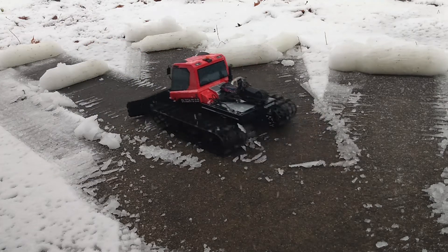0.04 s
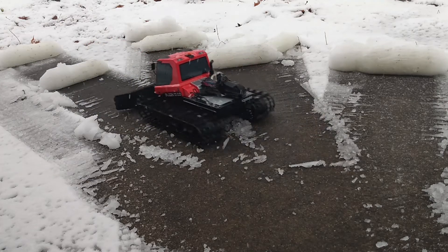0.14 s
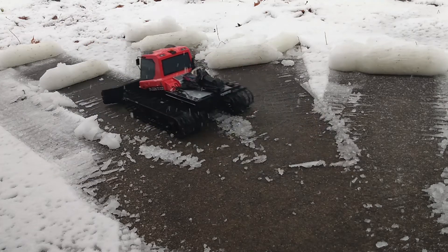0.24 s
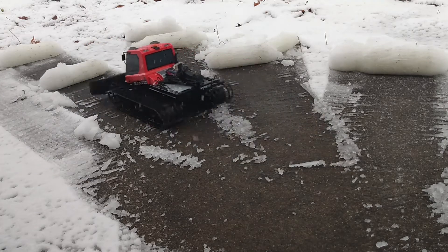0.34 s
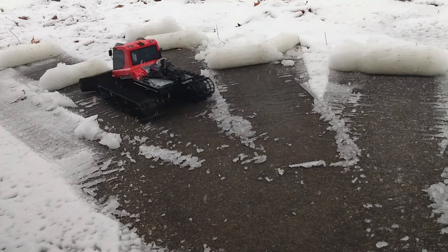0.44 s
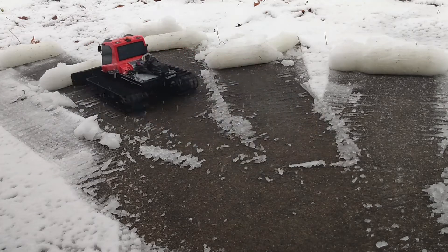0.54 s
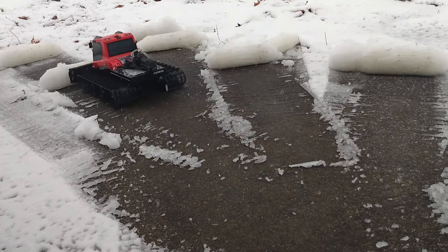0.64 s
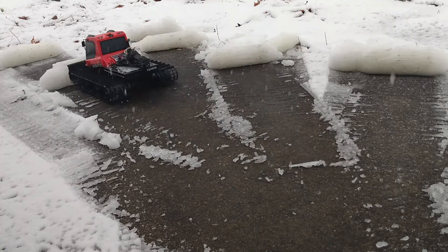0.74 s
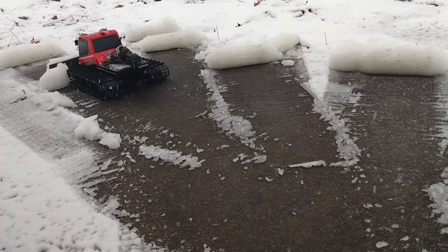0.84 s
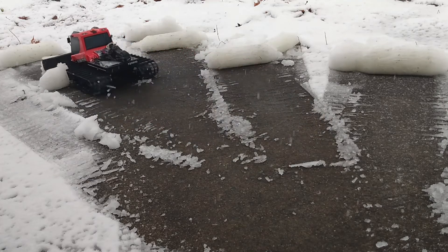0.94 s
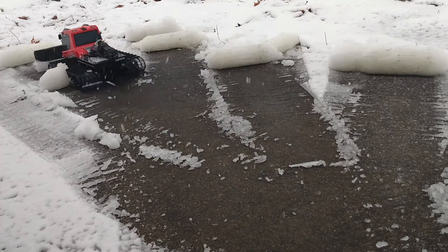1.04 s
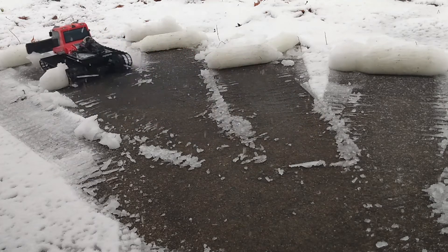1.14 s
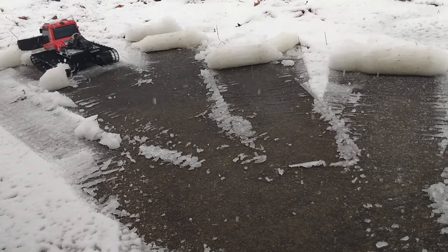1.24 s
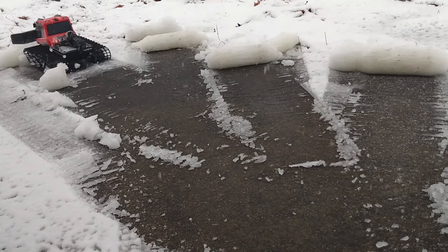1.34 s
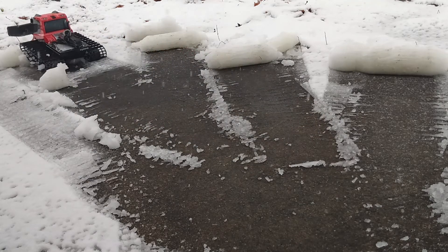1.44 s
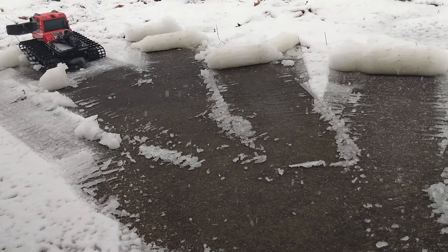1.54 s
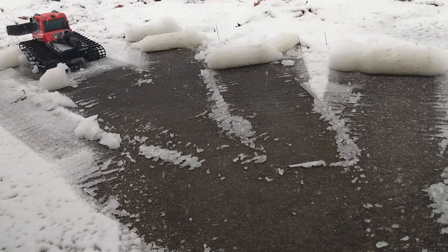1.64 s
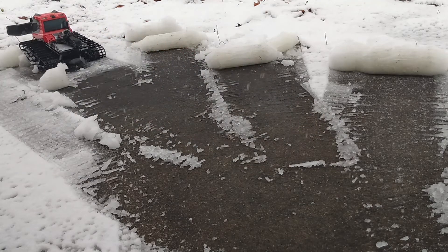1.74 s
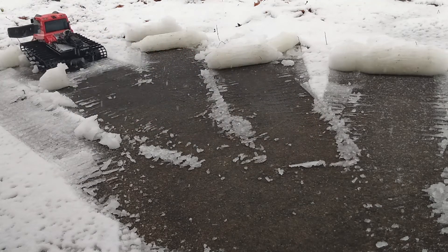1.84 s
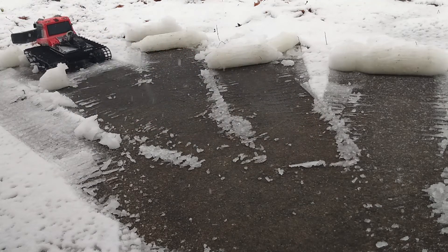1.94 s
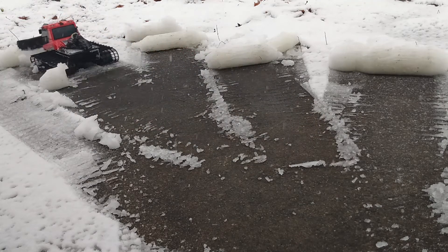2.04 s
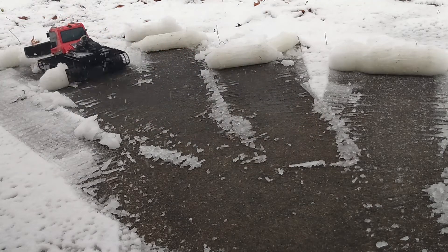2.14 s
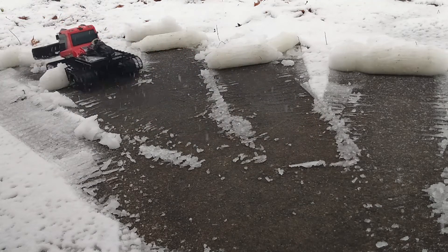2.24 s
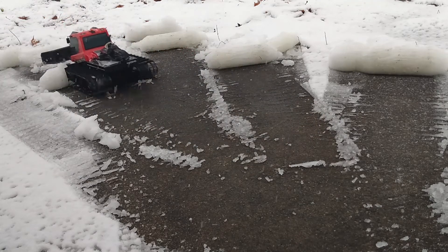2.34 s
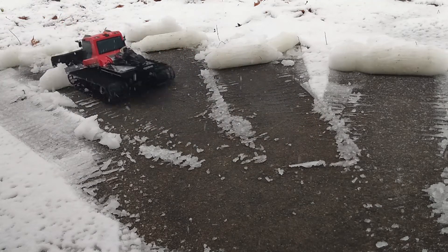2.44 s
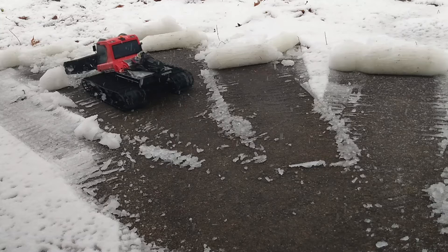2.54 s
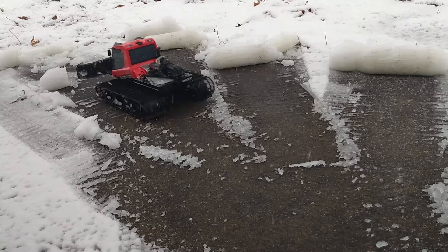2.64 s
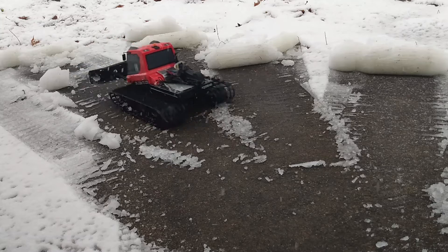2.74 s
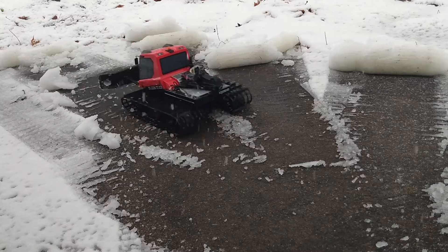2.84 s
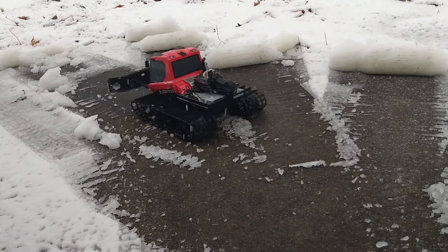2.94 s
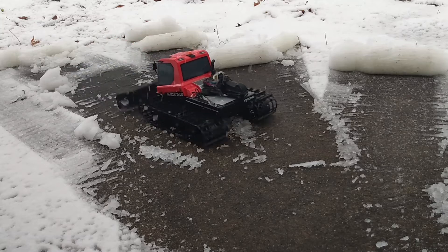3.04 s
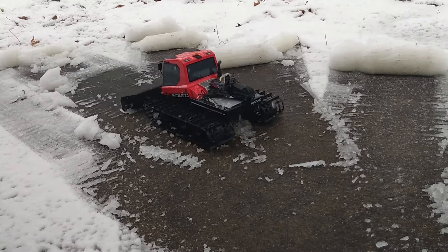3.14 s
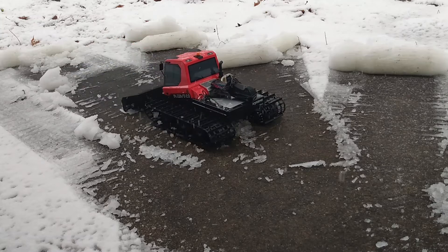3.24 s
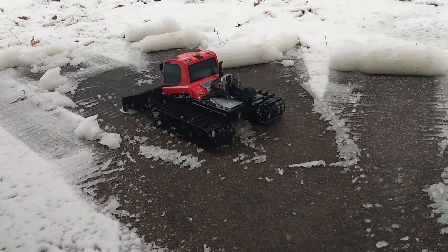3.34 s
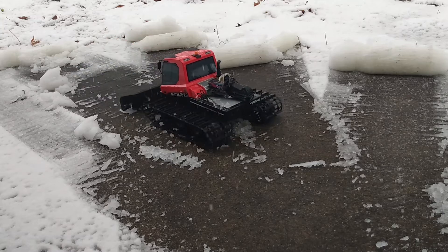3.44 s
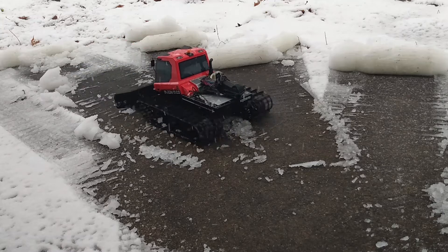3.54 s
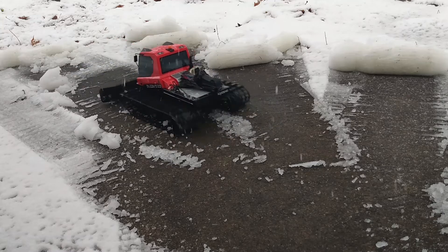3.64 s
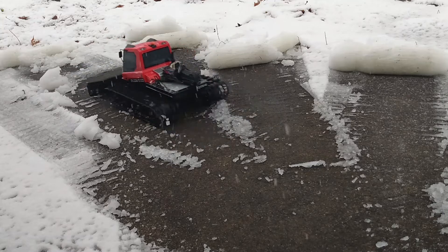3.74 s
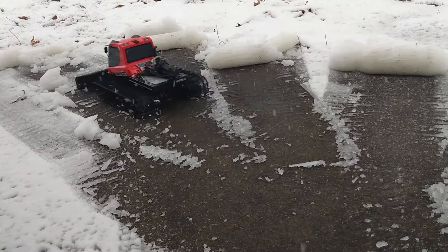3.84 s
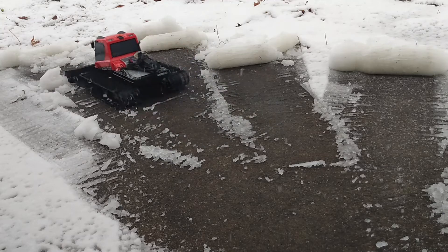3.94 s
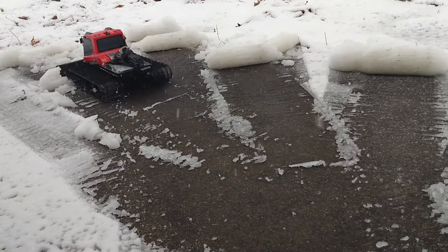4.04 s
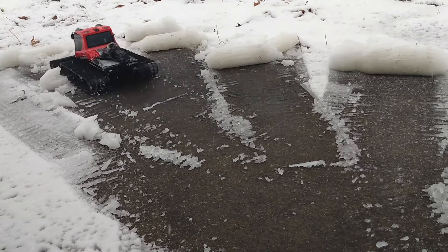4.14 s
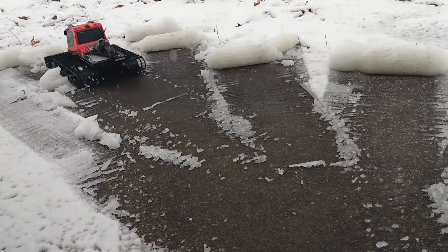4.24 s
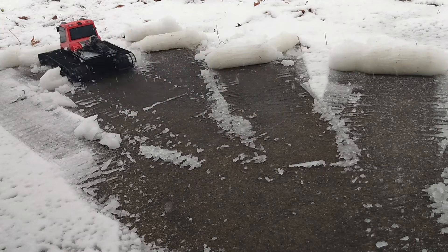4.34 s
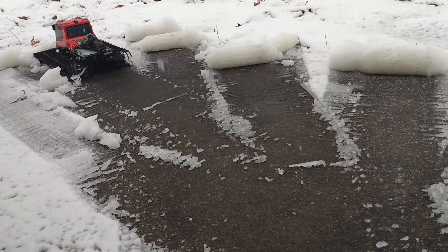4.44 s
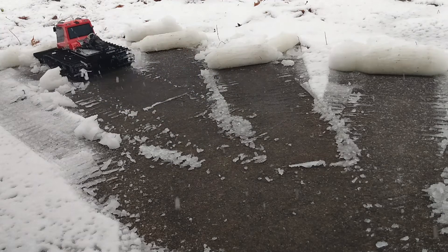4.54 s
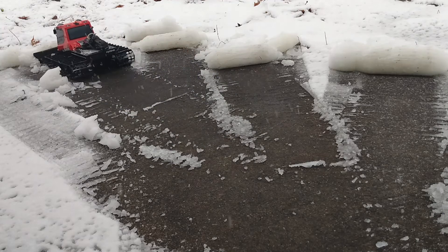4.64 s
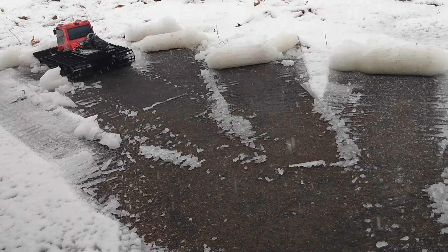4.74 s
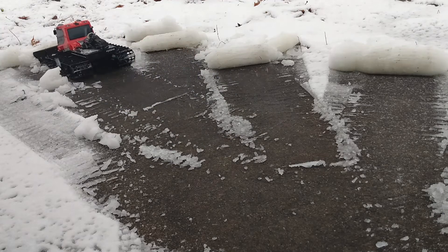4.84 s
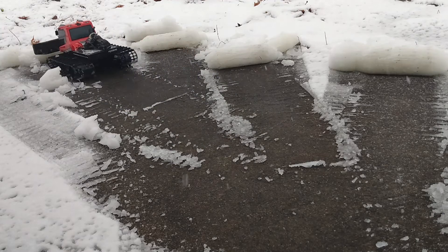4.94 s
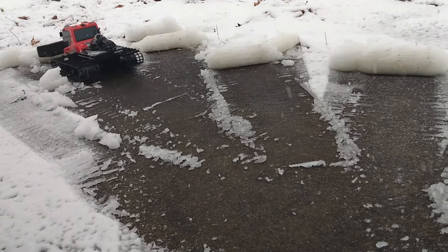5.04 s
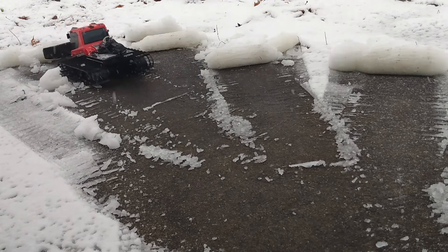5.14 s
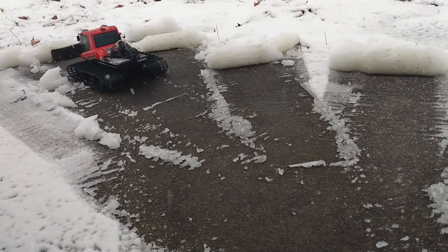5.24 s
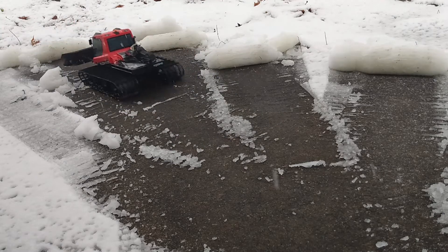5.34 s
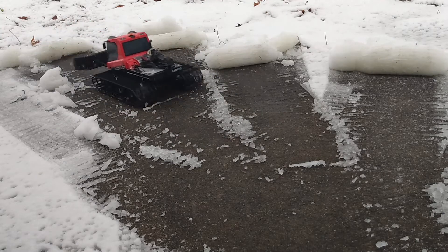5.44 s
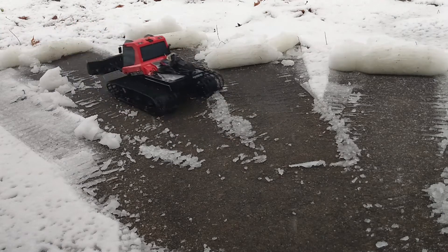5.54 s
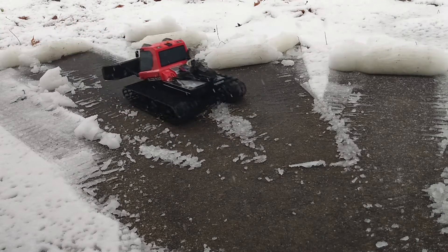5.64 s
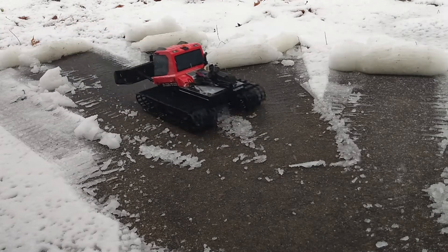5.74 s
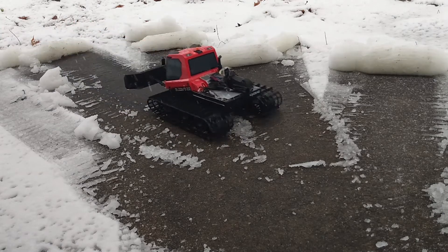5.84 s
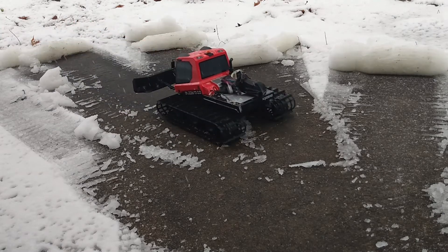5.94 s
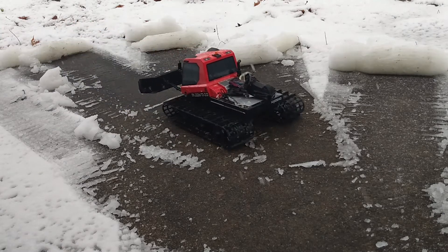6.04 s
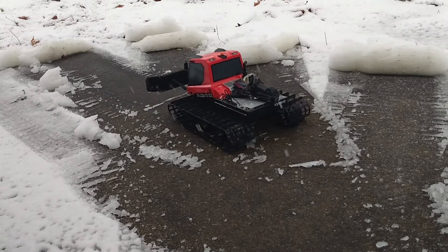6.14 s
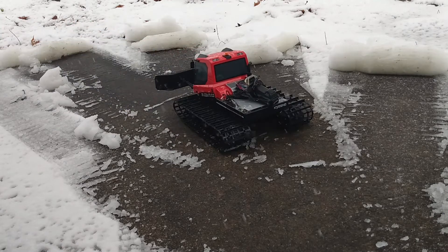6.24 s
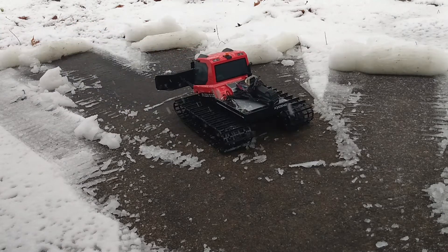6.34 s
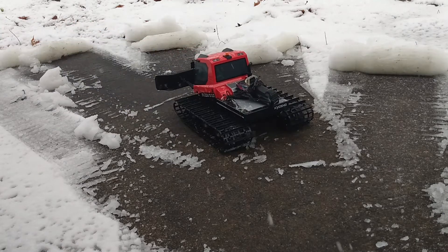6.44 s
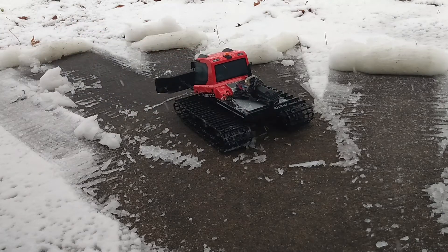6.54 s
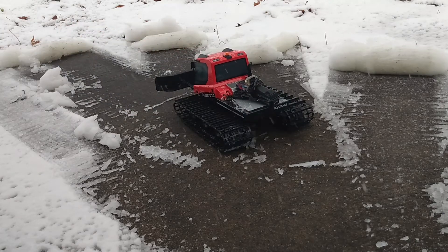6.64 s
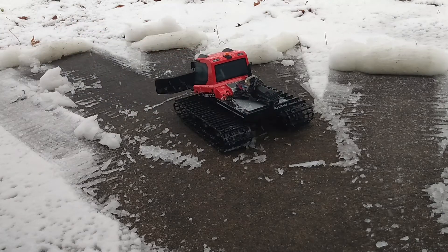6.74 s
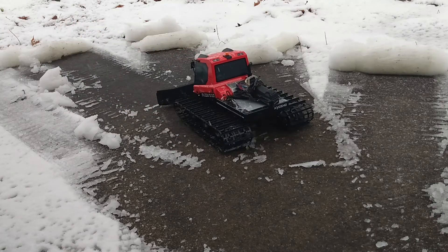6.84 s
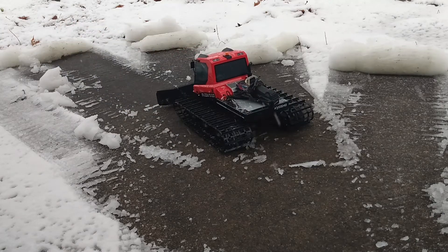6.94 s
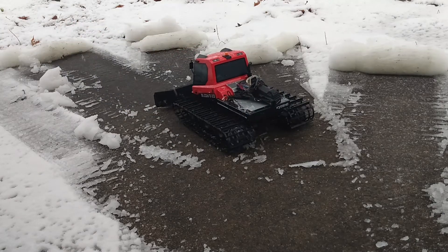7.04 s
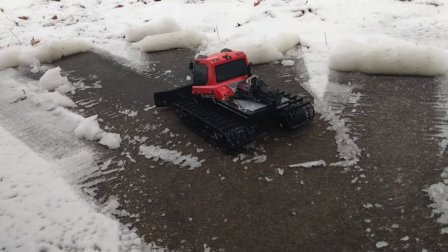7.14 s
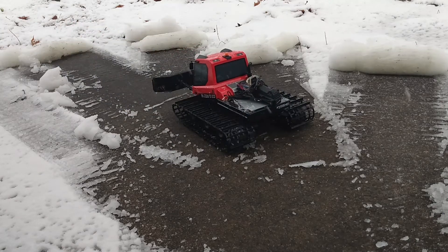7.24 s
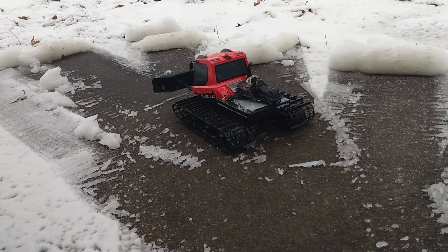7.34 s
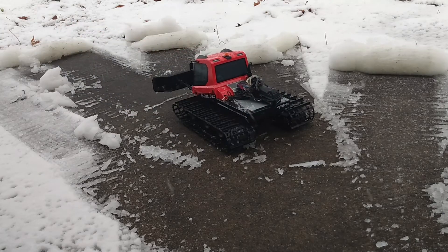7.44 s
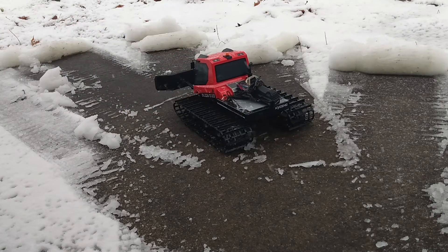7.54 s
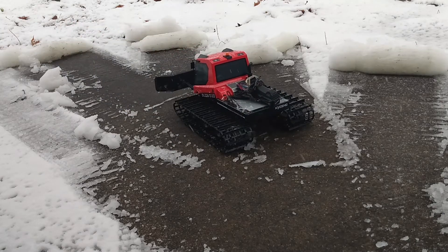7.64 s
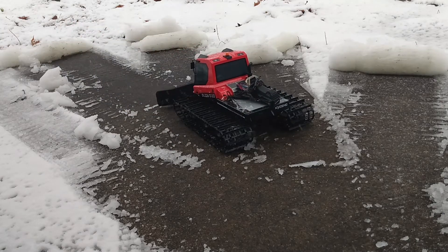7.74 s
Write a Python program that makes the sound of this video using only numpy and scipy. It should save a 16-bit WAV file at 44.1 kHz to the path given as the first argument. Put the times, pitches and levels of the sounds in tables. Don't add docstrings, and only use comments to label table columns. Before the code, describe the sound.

Outdoors in snow, a small motorised tracked model drives four short bursts. Cleats tap rapidly on wet concrete, ringing its plastic chassis, while gears sing around a nasal mid pitch and slush hisses. Sharp knocks and clicks mark starts and stops. The third run is the loudest. Finally the tracks stop and the blade servo gives tiny buzzing rattles and plastic knocks, over low far traffic, heard by two closely spaced microphones.

```python
import sys
import numpy as np
from scipy import signal
from scipy.io import wavfile
from scipy.ndimage import uniform_filter1d

SR = 44100
rng = np.random.default_rng(int(sys.argv[2]) if len(sys.argv) > 2 else 0)


def nominal_scale(level):
    x = np.asarray(level, float) / 20
    return 10 ** x


def inscribe(sig):
    pcm = np.round(np.clip(np.atleast_2d(sig).T, -1, 1) * 32767)
    wavfile.write(sys.argv[1], SR, pcm.astype(np.int16))


N = 343980


def evened(x):
    return x / np.sqrt(np.mean(x ** 2) + 1e-20)


def read(points, hz):
    f, value = np.transpose(points)
    return np.interp(np.log(hz + 1), np.log(f + 1), value)


def play(rows):
    s, *columns = np.transpose(rows)
    return [np.interp(np.arange(N) / SR, s, column) for column in columns]


def add(mix, s, sound):
    part = mix[round(s * SR):][:len(sound)]
    part += sound[:len(part)]


def fade_in(s, length_s):
    return np.clip((np.arange(N) / SR - s) / length_s, 0, 1)


def fade_out(s, length_s):
    return np.clip((s - np.arange(N) / SR) / length_s, 0, 1)


def drift(per_s):
    steps = rng.standard_normal(N * 1000 // SR + 2)
    span = max(int(300 / per_s), 2)
    slow = uniform_filter1d(uniform_filter1d(steps, span), span // 2)
    return np.interp(np.arange(N) * 1000 / SR, np.arange(len(slow)), evened(slow))


def taps(per_s, spread_db, smooth):
    size = nominal_scale(spread_db * np.minimum(rng.exponential(1, N), 4)) * rng.standard_normal(N)
    impacts = evened(size * (rng.random(N) < per_s / SR))
    return impacts * (1 - smooth) + smooth * rng.standard_normal(N)


def bumps(per_s, tail_s):
    kicks = rng.exponential(1, N) * (rng.random(N) < per_s / SR)
    shake = signal.lfilter([1], [1, -np.exp(-1 / (tail_s * SR))], kicks)
    log_shake = np.log(.5 + shake)
    return evened(log_shake - log_shake.mean())


def colour(x, points):
    hz = abs(np.fft.fftfreq(4096, 1 / SR))
    log_gain = np.log(nominal_scale(np.maximum(read(points, hz), -70)))
    kernel = np.fft.ifft(np.exp(np.conj(signal.hilbert(log_gain)))).real[:2048]
    return evened(signal.oaconvolve(x, kernel)[:N])


def ring(x, hz, width):
    return signal.lfilter(*signal.iirpeak(hz, hz / max(width, 5), SR), x)


def body(drive, modes, waver_db, per_s):
    out = np.zeros(N)
    for k, (hz, width, db) in enumerate(modes):
        out += (-1) ** k * nominal_scale(db + waver_db * drift(per_s)) * evened(ring(drive, hz, width))
    return out


def swells(rows, under_db=-120):
    t = np.arange(0, N + 40, 40) / SR
    s, db, rise, fall = np.transpose(rows)[:, :, None]
    away = np.where(t < s, (s - t) / np.maximum(rise, .003), (t - s) / np.maximum(fall, .003))
    power = nominal_scale(2 * np.maximum(db - 20 * away ** 1.33, -150)).sum(0)
    return 10 * np.log10(nominal_scale(2 * under_db) + np.interp(np.arange(N) / SR, t, power))


# (t/s, track effort level/dB, slush under the tracks level/dB)
RUNS = [
    [(0.0, -34.5, 1), (0.35, -31.5, 1), (0.7, -31, -1), (0.79, -37, -1), (0.96, -36, 0.5),
     (1.0, -33.5, 2.5), (1.35, -34.5, 0.5), (1.55, -50.5, -2), (1.66, -74, -11)],
    [(1.81, -85, -6), (1.86, -55, -6.5), (1.99, -40.5, -0.5), (2.2, -35.5, 1.5), (2.53, -31.5, 3.5),
     (2.85, -32.5, 2.5), (3.07, -37.5, -1.5), (3.24, -43.5, -6), (3.34, -73, -3)],
    [(3.38, -65, -8), (3.47, -43, -7), (3.58, -34, -3), (3.77, -27, -1), (3.96, -29, 0), (4.33, -32.5, 1.5),
     (4.64, -37, 2), (4.735, -53, 2), (4.9, -63.5, -3.5)],
    [(4.98, -48, -4.5), (5.2, -37, 2.5), (5.36, -32, 3), (5.77, -32, 3), (5.98, -37, 1), (6.14, -42, -1),
     (6.28, -37.5, 0), (6.37, -56, -7), (6.45, -74, -4)],
]


def run_levels():
    return play(sum(RUNS, []))


def follows(cruise_level_db, slope):
    return cruise_level_db + slope * (run_levels()[0] + 35)


# (f/Hz, width/Hz, level/dB)
CHASSIS_MODES = [(489.5, 21, -6), (578, 38, -10), (631, 40, -5.5), (777, 190, -6), (876.5, 67, 0.5),
                 (1095, 143, 0.5), (1376, 53, -5.5), (1750, 140, -7.5), (2130, 460, 0), (2543, 140, -4.5)]
# (f/Hz, width/Hz, level/dB)
GRIT_MODES = [(3480, 70, -38), (4480, 250, -14.5), (5760, 320, -13.5), (9900, 170, -44)]
# (f/Hz, level/dB per Hz)
CLEAT_COLOUR = [(210, -37.5), (350, 2), (977, -5.5), (1160, -0.5), (2140, -2.5), (2800, -7.5), (3640, -28),
                (6160, -120)]
# (f/Hz, level/dB per Hz)
GRIT_COLOUR = [(1530, -18.5), (2600, -7.5), (3010, -9.5), (3840, -5.5), (7470, -14.5), (8100, -18),
               (10500, -26), (17800, -120)]
# (f/Hz, level/dB per Hz)
SPRAY_COLOUR = [(5000, -42), (7900, -8), (10000, -3.5), (13000, -2.5), (15000, -0.5), (16000, -7)]
# (peak t/s, level/dB, rise/s, fall/s)
SKIDS = [(3.16, -39.5, 0.037, 0.056), (3.472, -43, 0.01, 0.044), (3.55, -37, 0.018, 0.037),
         (4.77, -41, 0.023, 0.063), (5.09, -40, 0.057, 0.4), (2.6, -62, .004, .08),
         (1.941, -48.5, .004, .2), (4.957, -53, .004, .12), (5.048, -43.5, .004, .08),
         (3.44, -55, .005, .05), (1.2, -47, .005, .2), (6.3, -54, 0.054, 0.023)]
# (peak t/s, level/dB, rise/s, fall/s)
PANEL_SHAKES = [(0.42, -43, 0.056, 0.1), (0.64, -42.5, 0.089, 0.39), (1.21, -50, 0.43, 0.13),
                (2.46, -42, 0.12, 0.15), (2.64, -41, 0.28, 0.15), (3.96, -40.5, 0.36, 0.93),
                (5.35, -41.5, 0.091, 0.03), (5.6, -35.5, 0.14, 0.12), (5.71, -50, 0.1, 0.058)]


def tracks():
    clatter_db, slush_db = run_levels()
    steady_grit_db = follows(-39.5, 0.8) + slush_db
    grit_db = swells(SKIDS, steady_grit_db)
    spray_db = follows(-41.5, 0.95) + slush_db + 0.58 * (grit_db - steady_grit_db)
    drone_db = swells(PANEL_SHAKES, follows(-46, 0.87))
    jolt_db = bumps(46, 0.0039)

    slaps, shakes = taps(1500, 1.0, 0.63), taps(3200, 2.0, 0.56)
    grains, drops = taps(3500, 0.68, 0.95), taps(3000, 2.2, 1.0)
    chassis = evened(body(shakes, CHASSIS_MODES, 1.0, 5))
    clatter = evened(colour(slaps, CLEAT_COLOUR) + nominal_scale(-1) * chassis)
    grit = evened(colour(grains, GRIT_COLOUR) + body(drops, GRIT_MODES[:3], 2.0, 5))
    spray = evened(colour(drops, SPRAY_COLOUR) + body(grains, GRIT_MODES[3:], 2.5, 4))
    high_drone = evened(ring(ring(shakes, 298.4, 45), 298.4, 45))
    low_drone = evened(ring(slaps, 233.3, 40.5))
    drone = evened(high_drone + 0.73 * low_drone)

    fizz = nominal_scale(0.049 * jolt_db) * (nominal_scale(grit_db) * grit + nominal_scale(spray_db) * spray)
    rolling = nominal_scale(clatter_db + 0.084 * jolt_db) * clatter + fizz + nominal_scale(drone_db) * drone
    return rolling * fade_out(6.5, 0.12)


# (peak t/s, level/dB, rise/s, fall/s)
GEARBOX_LOADS = [(0.112, -36, 0.14, 0.24), (0.35, -29, 0.27, 0.22), (0.58, -35, 0.3, 0.12),
                 (1.08, -30.5, 0.15, 0.15), (1.3, -35, 0.48, 0.26), (2.08, -33.5, 0.047, 0.12),
                 (2.2, -31, 0.025, 0.077), (2.4, -42, 0.13, 0.099), (2.78, -32, 0.59, 0.2),
                 (3.17, -39, 0.091, 0.15), (3.97, -25, 0.35, 0.12), (4.55, -31, 0.64, 0.054),
                 (4.7, -39, 0.077, 0.018), (5.07, -40, 0.088, 0.055), (5.8, -28.5, 0.35, 0.17),
                 (6.17, -46, 0.089, 0.1), (6.335, -46, 0.02, 0.058)]
# (t/s, f/Hz)
HOUSING_PITCH = [(0.3, 1164), (1.2, 1116), (2.3, 1133), (2.8, 1188), (3.9, 1172), (4.5, 1128), (5.7, 1186),
                 (6.2, 1204)]


def gearbox():
    effort_db = follows(-40.5, 1)
    db = np.minimum(swells(GEARBOX_LOADS, effort_db), effort_db + 14)
    hz = play(HOUSING_PITCH)[0] * (1 + 0.026 * drift(3.1))
    turn = np.exp(2j * np.pi * np.cumsum(hz) / SR)
    r = np.exp(-np.pi * 52 / SR)
    slow_ring = signal.lfilter([1], np.convolve([1, -r], [1, -r]), taps(2500, 2.0, 0.8) / turn)
    hum = (turn * slow_ring).real
    return nominal_scale(db - 7.5) * evened(hum) * fade_out(6.45, 0.046)


# (peak t/s, level/dB, rise/s, fall/s, f/Hz)
MODE_SINGS = [(0.92, -58, 0.22, .1, 2130), (1.2, -44.5, 0.57, 0.19, 2130), (1.25, -46, 0.18, .1, 2530),
              (1.28, -42, 0.052, .08, 1294), (1.45, -48.5, 0.14, 0.18, 638), (2.12, -44, .1, 0.099, 910),
              (2.45, -40, 0.47, 0.33, 2170), (2.55, -43.5, 0.46, 0.56, 590), (2.5, -44, 0.51, 0.34, 2410),
              (2.8, -40, 0.4, 0.14, 1404), (3.85, -34.5, 0.07, 0.091, 567), (3.98, -36.5, 0.37, 0.41, 1397),
              (4.42, -38, 0.3, 0.3, 640), (4.36, -41, 0.11, 0.084, 503), (4.5, -40.5, 0.14, 0.11, 1320),
              (5.47, -39.5, 0.23, 0.26, 545), (5.4, -39, 0.29, 0.18, 2200), (5.68, -38.5, 0.39, 0.27, 2095),
              (5.8, -39.5, 0.34, 0.36, 1372), (6.0, -46, 0.061, 0.11, 500)]


def sings():
    out, drive, width_hz = np.zeros(N), taps(2000, 1.2, 0.51), 85
    for s, db, rise, fall, hz in MODE_SINGS:
        first = max(round((s - 1.4 * rise) * SR), 0)
        t = np.arange(first, round((s + 1.46 * fall) * SR)) / SR
        away = np.where(t < s, (s - t) / max(rise, .01), (t - s) / max(fall, .01))
        mode = ring(ring(drive[first:first + len(t)], hz, width_hz), hz, width_hz)
        add(out, first / SR, nominal_scale(db - 20 * away ** 2) * evened(mode))
    return out


# (f/Hz, level/dB per Hz)
CRUNCH_COLOUR = [(400, -28), (800, 12), (1300, -7), (2300, -1), (4500, -5), (7500, -23.5), (12000, -17),
                 (16000, -20)]


def crunch():
    t = np.arange(400) / SR
    train = colour(taps(260, 2.0, 0), CRUNCH_COLOUR) * nominal_scale(follows(-49, 1.05))
    echoes = rng.standard_normal((2, len(t))) * nominal_scale(-60 * t / .006)
    echoes /= np.linalg.norm(echoes, axis=1, keepdims=True)
    return signal.oaconvolve(train[None], echoes, axes=1)[:, :N]


# (t/s, f/Hz, level/dB)
START_WHINE = [(0.0, 347, -31), (0.04, 366.4, -33), (0.136, 419, -38.5), (0.318, 460, -38),
               (0.466, 479.5, -39), (0.53, 490, -50)]
# (t/s, f/Hz, level/dB)
BRAKE_WHINE = [(6.14, 1100, -52), (6.168, 1127, -40), (6.21, 1165, -36), (6.242, 1190, -32),
               (6.27, 1150, -35), (6.3, 1105, -46)]
# (t/s, f/Hz, level/dB)
PANEL_TONE = [(3.85, 280, -46), (3.89, 283, -32), (4.0, 292, -29.5), (4.15, 296, -30.5), (4.3, 290, -32),
              (4.4, 287, -38), (4.56, 289, -43)]
# (start t/s, length/s, first f/Hz, last f/Hz, level/dB)
SQUEAKS = [(0.772, 0.16, 391, 361, -38.5), (5.864, 0.09, 1366, 1335, -43), (0.99, 0.046, 1086, 1120, -38),
           (1.04, 0.13, 1130, 1161, -36), (1.332, 0.06, 1123, 1115, -33), (3.425, 0.043, 1180, 1120, -49),
           (5.132, 0.038, 2460, 2440, -30), (7.241, 0.044, 4300, 3450, -53),
           (7.472, 0.054, 10230, 10280, -71), (7.3, 0.04, 2100, 2260, -61), (7.62, 0.092, 1110, 1180, -65)]
# (start t/s, length/s, first f/Hz, last f/Hz, level/dB)
MOTOR_STARTS = [
    (3.364, 0.045, 925, 935, -57),
    (7.472, 0.06, 930, 935, -62),
]
# (multiple of f, level/dB)
MOTOR_OVERTONES = [(1, -3), (2, -1), (3, -10), (4, -8), (6, -16), (8, -13)]


def gears():
    out, wobble, flutter = np.zeros(N), drift(25), drift(24)
    short = list(SQUEAKS)
    for s, length, first, last, db in MOTOR_STARTS:
        short += [(s, length, k * first, k * last, db + over_db) for k, over_db in MOTOR_OVERTONES]
    tones = [(START_WHINE, 0), (BRAKE_WHINE, 0), (PANEL_TONE, 2.8)]
    for s, length, first, last, db in short:
        middle = (s + length / 2, (first + last) / 2, db)
        tones.append(([(s, first, db - 3), middle, (s + length, last, db - 3)], 0))
    for rows, beat_db in tones:
        span = slice(round(rows[0][0] * SR), round(rows[-1][0] * SR))
        hz, db = (column[span] for column in play(rows))
        tone = np.sin(2 * np.pi * np.cumsum(hz * (1 + 0.0048 * wobble[span])) / SR)
        beat = np.sin(2 * np.pi * np.cumsum(17 * (1 + 0.17 * wobble[span])) / SR)
        level = nominal_scale(db + beat_db * beat + 2.0 * flutter[span])
        out[span] += 1.01 * level * tone * signal.windows.tukey(len(hz), .3)
    return out


# (t/s, peak level/dB, main ring f/Hz, 60 dB decay/s, share of dull crack)
KNOCKS = [(0.428, -6.5, 781, 0.073, 0.91), (0.54, -16, 1140, 0.11, 0.8), (0.603, -23, 1100, 0.03, 0.5),
          (1.223, -22, 915, 0.024, 0.69), (2.009, -31, 594, 0.039, 0.45), (2.077, -37, 1080, 0.027, 0.5),
          (3.243, -35, 1210, 0.03, 0.61), (3.439, -39, 550, 0.03, 0.5), (3.465, -30, 480, 0.036, 0.5),
          (3.5645, -27, 2700, 0.012, 0.7), (5.732, -15, 1400, 0.034, 0.36),
          (0.653, -12.5, 1460, 0.021, 0.22), (1.838, -37, 298, 0.041, 0.5), (1.88, -32, 304, 0.051, 0.5),
          (2.773, -16, 1280, 0.016, 0.2), (3.143, -18.5, 450, 0.19, 0.97), (3.146, -20, 1757, 0.059, 0.66),
          (3.532, -25, 1240, 0.021, 0.9), (6.935, -23, 1150, 0.033, 1.0), (6.939, -26.5, 573, 0.13, 0.65),
          (7.018, -43, 1150, 0.03, 0.6), (7.066, -45, 503, 0.05, 0.5), (7.101, -28, 1183, 0.05, 0.83),
          (7.155, -36, 870, 0.037, 0.5), (7.536, -36, 1200, 0.04, 0.4), (7.643, -51, 1140, 0.035, 0.3),
          (7.728, -44, 654, 0.044, 0.1), (7.239, -42, 1470, 0.02, 1), (7.56, -31.5, 432, 0.081, 0.49),
          (7.717, -37.5, 665, 0.035, 0.15)]


def knocks():
    out, t = np.zeros(N), np.arange(4000) / SR
    luck, crackle = rng.random((len(KNOCKS), 4)), rng.standard_normal((len(KNOCKS), len(t)))
    band = signal.butter(3, [330, 1950], "band", fs=SR, output="sos")
    crackle = evened(signal.sosfilt(band, crackle) + 0.03 * crackle)
    for (s, db, hz, t60, crack), chance, noise in zip(KNOCKS, luck, crackle):
        head = 1 + np.exp(-t / 0.003)
        fall = nominal_scale(-60 * t / max(t60, .005)) * np.minimum(t / 0.00056, 1) * head
        pitches = hz * np.array([0.997, 0.43, 0.814, 1.8]) * (0.927 + 0.081 * chance)
        cluster = np.array([1.0, 0.15, 0.52, 0.28]) @ np.sin(2 * np.pi * np.outer(pitches, t))
        thud = 0.07 * np.sin(2 * np.pi * 255 * t) * np.sqrt(fall)
        blow = cluster * fall + thud + crack * noise * fall ** 0.71
        add(out, s, nominal_scale(db) * blow / abs(blow).max())
    return out


# (t/s, peak level/dB, f/Hz, 60 dB decay/s)
PINGS = [(0.281, -29, 2600, .015), (0.995, -27, 1120, .05), (1.972, -38, 5000, .02),
         (3.404, -46, 1320, .04), (3.4715, -31, 6300, .022), (3.51, -32, 1190, .04),
         (3.547, -29, 4250, .022), (3.547, -32, 3100, .02), (3.676, -21, 692, .03), (3.88, -25, 2400, .015),
         (4.7655, -37, 1850, .045), (4.7655, -35, 2830, .045), (4.767, -39, 4600, .04),
         (4.919, -48, 899, .07), (4.965, -36, 1150, .025), (4.978, -45, 3800, .03), (4.995, -36, 1170, .04),
         (5.055, -35, 1130, .06), (5.114, -34, 5800, .02), (5.307, -26, 1000, .03),
         (6.9355, -34, 2200, .03), (6.9355, -40, 4200, .02), (6.9355, -43, 6200, .012),
         (7.0, -45, 1110, .03), (7.099, -39, 2050, .04), (7.239, -44, 1450, .035), (7.502, -49, 1860, .03),
         (7.535, -45, 2300, .02), (7.557, -37, 1200, .02), (7.624, -42, 2600, .015),
         (7.642, -50, 6500, .015), (7.655, -48, 3000, .012)]


def pings():
    out, t = np.zeros(N), np.arange(3000) / SR
    for s, db, hz, t60 in PINGS:
        pair = np.sin(2 * np.pi * hz * t) + 0.3 * np.sin(2 * np.pi * 1.13 * hz * t)
        fall = nominal_scale(db - 60 * t / max(t60, .005)) * np.minimum(t / 0.00057, 1)
        add(out, s, fall * pair)
    return out


# (t/s, peak level/dB)
TICKS = [(0.4289, -37), (1.705, -62), (1.7589, -49), (1.771, -60), (1.9729, -40), (3.4466, -50),
         (3.4575, -42), (4.9631, -46), (7.3477, -49), (1.939, -39), (3.473, -24), (3.5468, -33),
         (3.564, -35), (4.7381, -29), (5.0774, -26), (5.1143, -38), (6.125, -38), (6.336, -38),
         (6.354, -42), (6.372, -42), (6.395, -52), (6.4622, -49), (6.473, -53), (6.4822, -45), (6.717, -58),
         (6.777, -51), (6.782, -56), (1.8627, -54), (3.486, -42), (7.718, -57), (6.8813, -54),
         (6.9344, -30), (7.0618, -54), (7.202, -39), (7.5577, -46), (7.582, -30), (7.623, -30),
         (7.654, -38), (7.643, -49), (7.665, -50)]


def ticks():
    out, t = np.zeros((2, N)), np.arange(600) / SR
    for (s, db), (shared, side) in zip(TICKS, rng.standard_normal((len(TICKS), 2, len(t)))):
        for port, own in zip(out, (shared + side, shared - side)):
            bright, dull = np.diff(own, prepend=0), uniform_filter1d(own, size=5)
            snap = (bright + .25 * dull) * nominal_scale(-60 * t / 0.012)
            add(port, s, nominal_scale(db - 1.0) * snap / abs(snap).max())
    return out


# (f/Hz, width/Hz, level/dB)
SERVO_MODES = [(466, 110, 0), (889, 17, -2.5), (1150, 160, -4), (1640, 47, -12), (1940, 120, -9)]
# (peak t/s, gear rattle level/dB, rise/s, fall/s, fizz over rattle level/dB)
SERVO_STROKES = [(6.45, -62, 0.065, 0.03, -12), (6.486, -69, 0.038, 0.033, -2),
                 (6.775, -66.5, 0.26, 0.21, -10), (6.885, -73, 0.01, 0.12, 8),
                 (6.92, -67.5, 0.058, 0.12, 13.5), (7.065, -61, 0.014, 0.098, 11.5),
                 (7.205, -55, 0.01, 0.12, 1), (6.95, -47, 0.015, 0.04, -9), (7.03, -45, 0.06, 0.05, -11),
                 (7.068, -40.5, 0.027, 0.079, -10), (7.103, -43.5, 0.02, 0.09, -11),
                 (7.157, -48.5, 0.04, 0.083, -14), (7.25, -63.5, 0.055, 0.13, 11),
                 (7.389, -63, 0.2, 0.097, -2.5), (7.576, -39, 0.059, 0.056, -7.5),
                 (7.661, -55, 0.14, 0.041, -8), (7.719, -59.5, 0.016, 0.1, -5),
                 (7.76, -64.5, 0.04, 0.12, 1.5)]


def servos():
    rattle_db = swells([row[:4] for row in SERVO_STROKES])
    fizz_db = swells([(s, db + over_db, rise, fall) for s, db, rise, fall, over_db in SERVO_STROKES])
    teeth, rubs = taps(1800, 1.6, .5), taps(1800, 1.6, .5)
    case = evened(body(rubs, SERVO_MODES, 1.3, 19))
    rattle = evened(colour(teeth, CLEAT_COLOUR) + nominal_scale(3.5) * case)
    fizz = evened(colour(rubs, GRIT_COLOUR) + 0.83 * colour(teeth, SPRAY_COLOUR))
    running = nominal_scale(rattle_db) * rattle + nominal_scale(fizz_db) * fizz
    return nominal_scale(bumps(200, 0.005)) * running * fade_in(6.4, 0.051)


# (f/Hz, share of power)
DIRECT_SHARE = [(100, 0.93), (300, 0.77), (1000, 0.83), (2000, 0.92), (4000, 0.37), (8000, 0.079),
                (16000, 0.035)]
# (f/Hz, level/dB)
LEFT_LEAN = [(60, 7), (180, 0.5), (550, 1.5), (1650, 0.5), (4970, 0.0), (15000, -1)]
# (t/s, lead of the left port/samples)
LEFT_LEAD = [(0, 1.8), (.75, 5.5), (1.25, 6.6), (2, 7.9), (2.75, 3.6), (3.25, 3.3), (3.75, 4.9),
             (4.25, 5.7), (4.75, 5.2), (5.25, 5.6), (5.75, 2.6), (6.25, 1.9), (7.8, 4)]


def ports(x, focus):
    hz, s, z = signal.stft(x, SR, nperseg=256, noverlap=192)
    quick = rng.standard_normal((len(s), len(hz), 2, 2))
    slow = uniform_filter1d(quick, size=10, axis=0)
    treble = (hz > 2600)[:, None]
    a, b = np.where(treble, quick.T, slow.T)
    scatter = np.where(treble, 2, 1.5) * np.exp(1j * np.arctan2(a, b))
    share = np.clip(read(DIRECT_SHARE, hz), 0, 1)[:, None] ** focus
    lead = np.interp(s, *np.transpose(LEFT_LEAD))
    half_lead = np.exp(1j * np.pi * np.outer(hz, lead) / SR)
    direct = np.sqrt(share) * np.array([half_lead, 1 / half_lead])
    pair = z * (direct + np.sqrt(1 - share) * scatter)
    lean = nominal_scale(read(LEFT_LEAN, hz) / 2)[:, None]
    return signal.istft(pair * np.array([lean, 1 / lean]), SR, nperseg=256, noverlap=192)[1][:, :N]


# (f/Hz, level/dB per Hz)
TOWN_COLOUR = [(15, -50), (25, -39), (49, -16), (64, -3.5), (84, -15.5), (94, 5), (114, -18.5), (195, -24),
               (217, -17.5), (476, -42.5), (818, -42.5), (962, -44.5), (1890, -45), (4300, -61),
               (7500, -63.5), (16000, -58)]
# (f/Hz, left-right likeness)
TOWN_SAME = [(60, 0.96), (180, 0.98), (550, 0.68), (1650, -0.71), (4970, -0.017), (15000, -0.064)]


def town():
    frames, hz = N // 512 + 5, np.fft.rfftfreq(2048, 1 / SR)
    a, b, c, d, patches = rng.standard_normal((frames, 1025, 5)).T
    patches = evened(uniform_filter1d(uniform_filter1d(patches, 6, 0), 10, 1))
    same = np.clip(read(TOWN_SAME, hz), -1, 1)[:, None]
    left = a + 1j * b
    right = same * left + np.sqrt(1 - same ** 2) * (c + 1j * d)
    patch_db = 4.6 * patches * np.clip(hz / 600, .2, 1)[:, None]
    z = np.array([left, right]) * nominal_scale(read(TOWN_COLOUR, hz)[:, None] + patch_db)
    far = signal.istft(z, nperseg=2048, noverlap=1536)[1][:, :N]
    steady = far / uniform_filter1d((far ** 2).mean(0), 12000) ** 0.35
    return nominal_scale(-47 - 0.24 * (np.arange(N) / SR - 3.0)) * evened(steady)


def scene():
    spread = ports(tracks() + gearbox() + sings() + servos(), 0.99)
    point = ports(knocks() + pings() + gears(), 0.02)
    return nominal_scale(-0.84) * spread + nominal_scale(-2.5) * point + crunch() + ticks() + town()


def top_cut(x):
    return signal.sosfilt(signal.butter(12, 16980, fs=SR, output="sos"), x)


def record(dry):
    cut = signal.sosfilt(signal.butter(2, 47, "high", fs=SR, output="sos"), dry)
    low_pass = signal.firwin(767, 15860, window=("kaiser", 7), fs=SR)
    limited = signal.oaconvolve(cut, low_pass[None], "same")
    return top_cut(limited)


dry = scene()
out = record(dry)
inscribe(out)
```